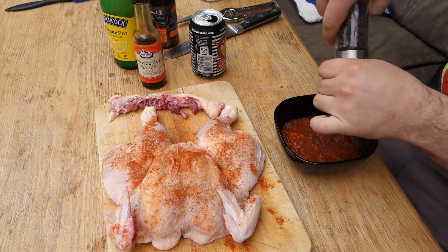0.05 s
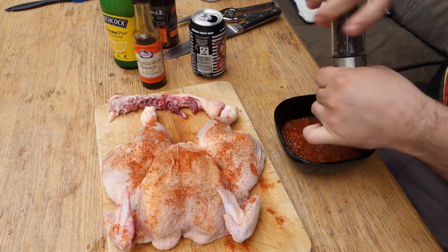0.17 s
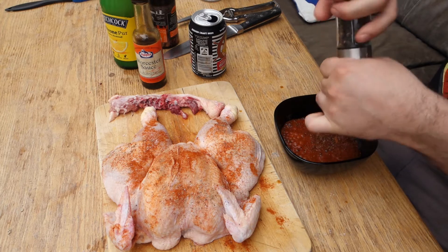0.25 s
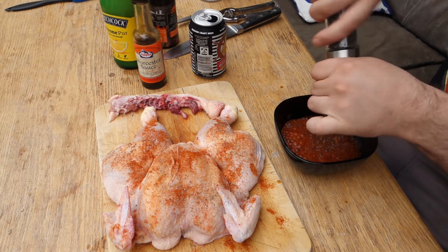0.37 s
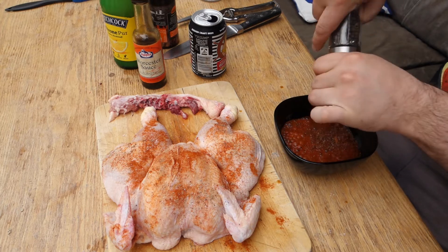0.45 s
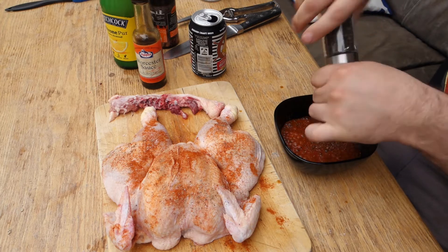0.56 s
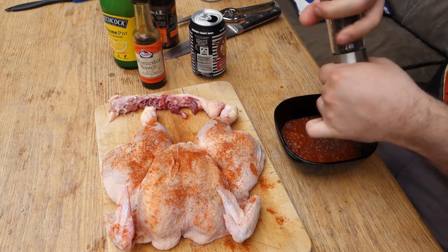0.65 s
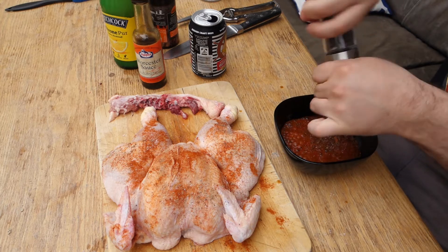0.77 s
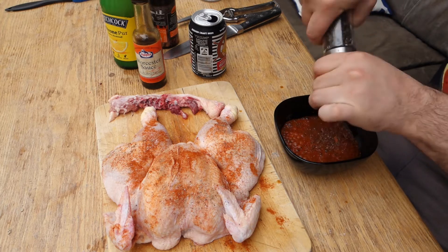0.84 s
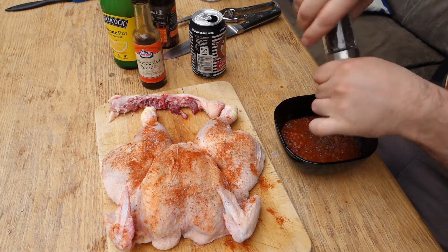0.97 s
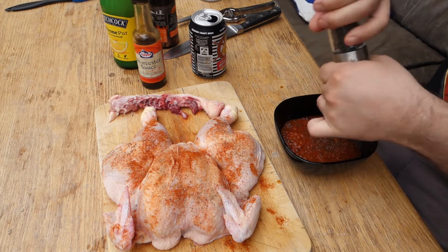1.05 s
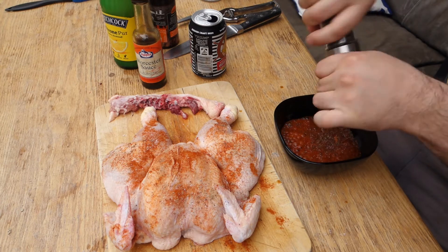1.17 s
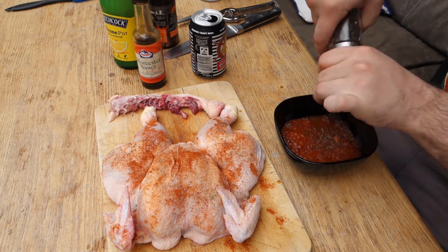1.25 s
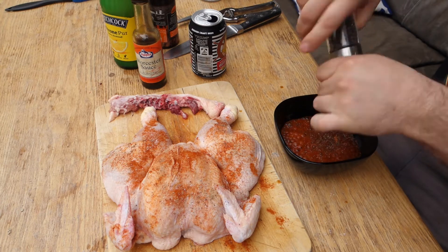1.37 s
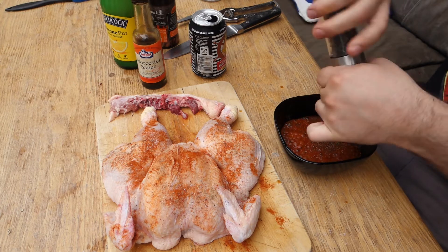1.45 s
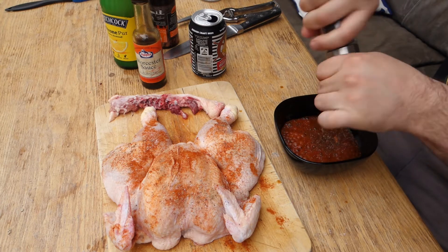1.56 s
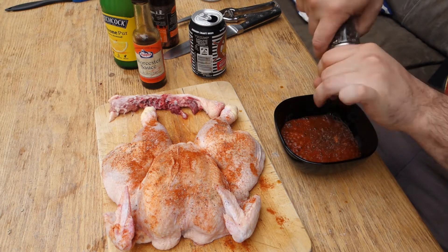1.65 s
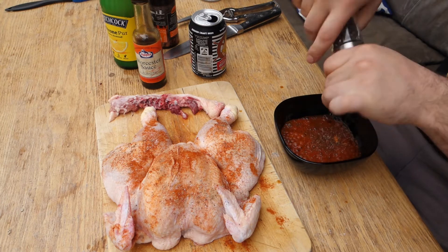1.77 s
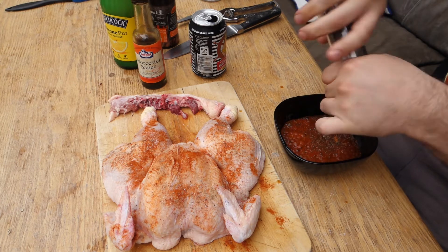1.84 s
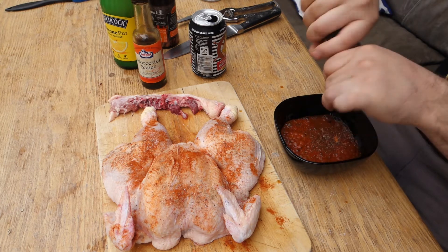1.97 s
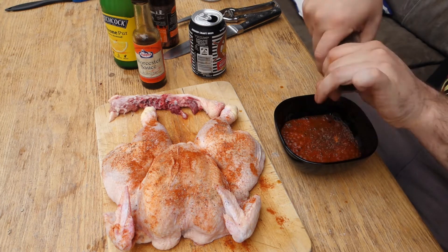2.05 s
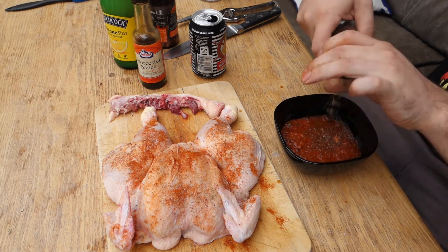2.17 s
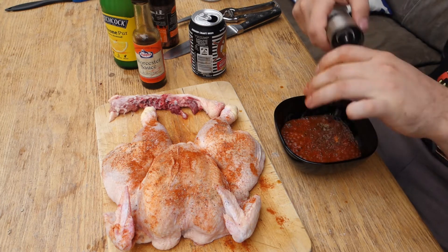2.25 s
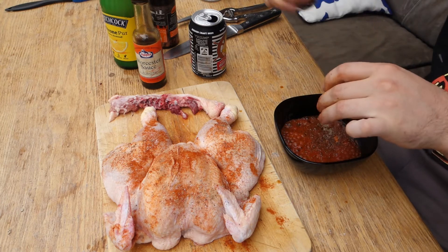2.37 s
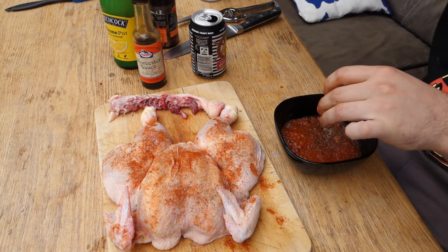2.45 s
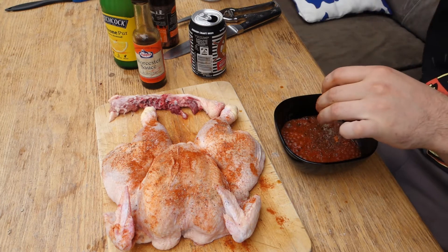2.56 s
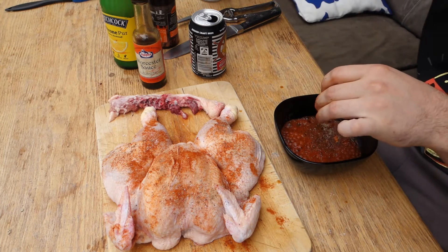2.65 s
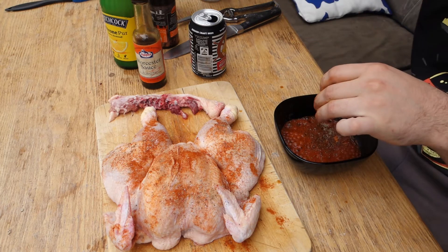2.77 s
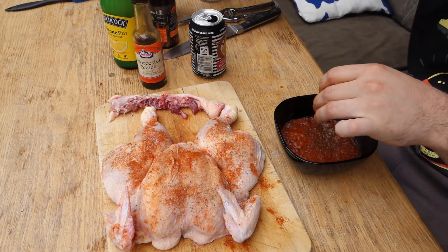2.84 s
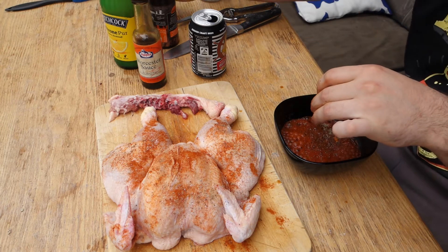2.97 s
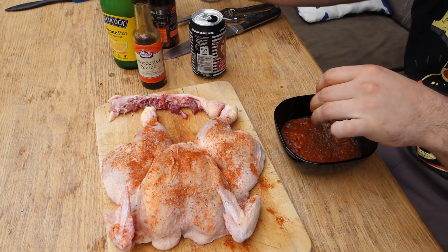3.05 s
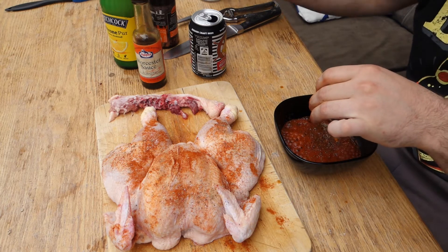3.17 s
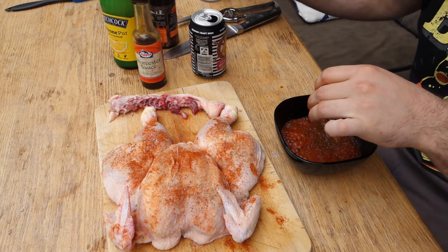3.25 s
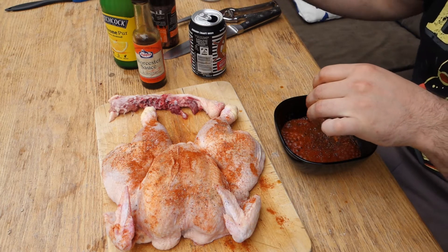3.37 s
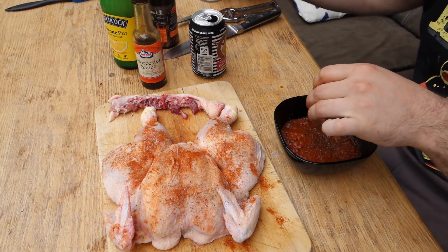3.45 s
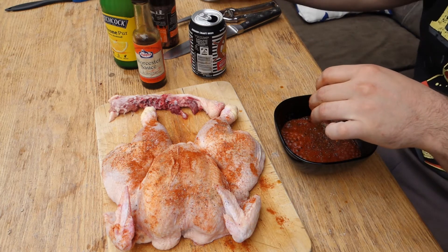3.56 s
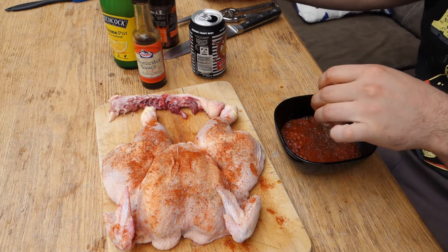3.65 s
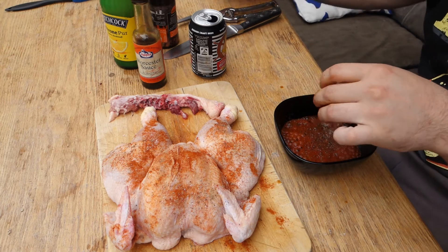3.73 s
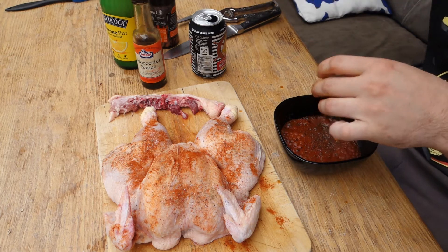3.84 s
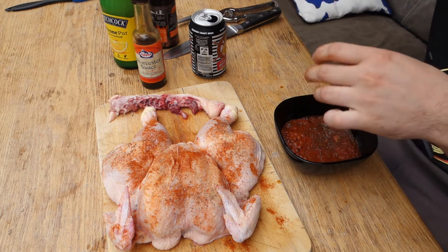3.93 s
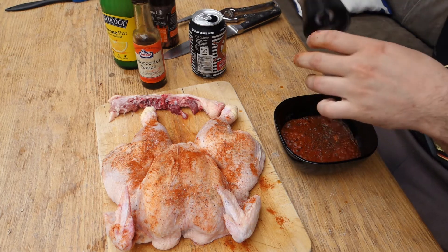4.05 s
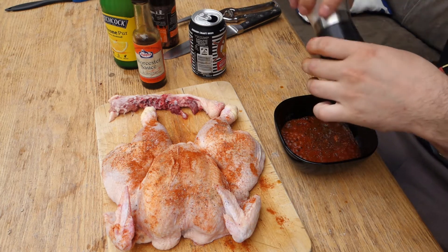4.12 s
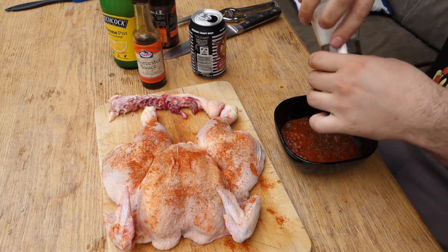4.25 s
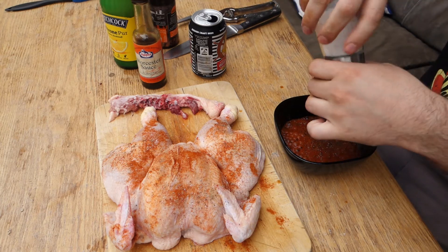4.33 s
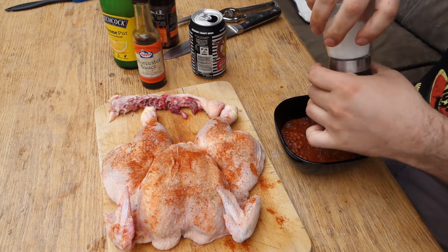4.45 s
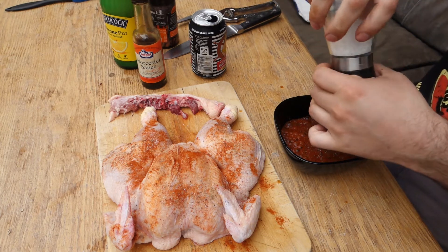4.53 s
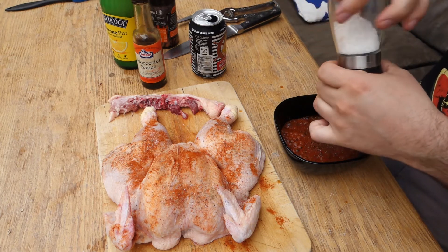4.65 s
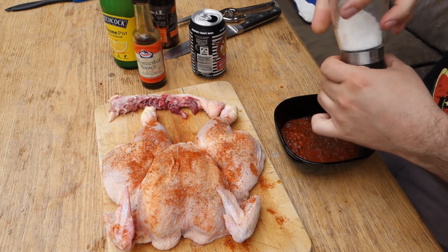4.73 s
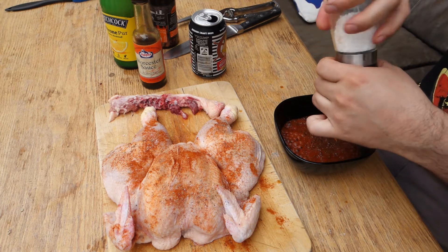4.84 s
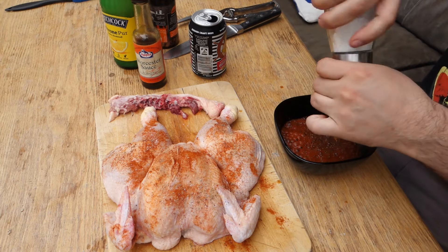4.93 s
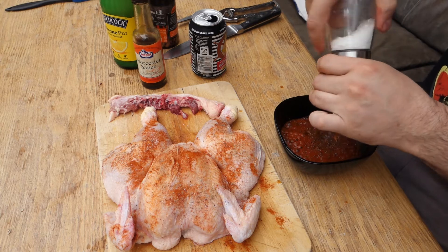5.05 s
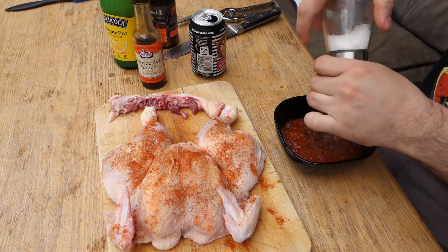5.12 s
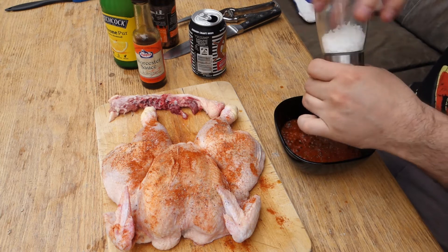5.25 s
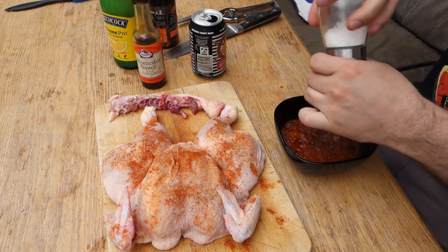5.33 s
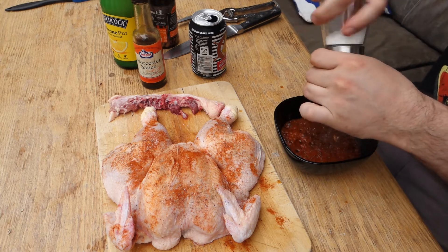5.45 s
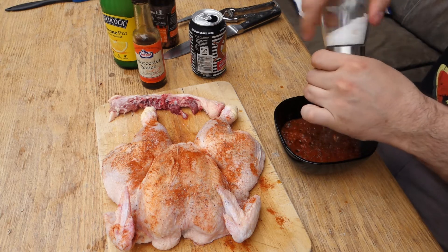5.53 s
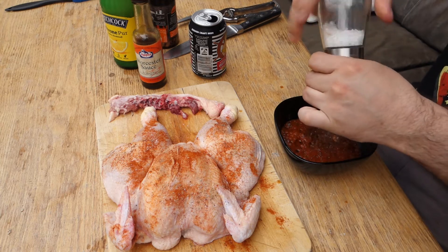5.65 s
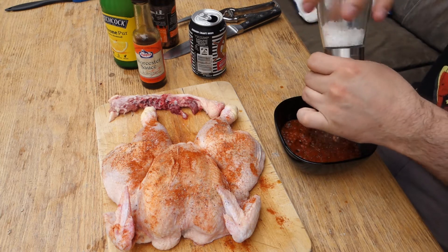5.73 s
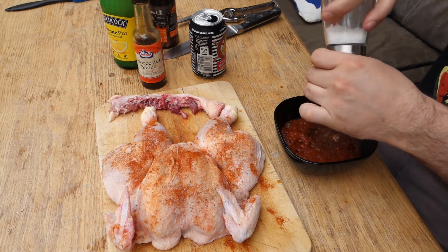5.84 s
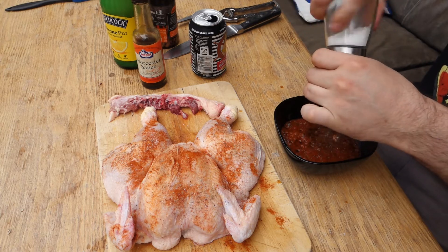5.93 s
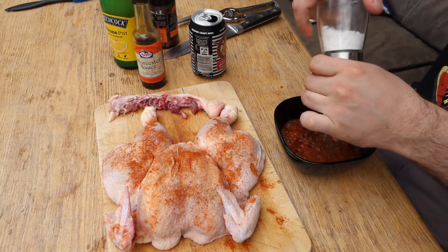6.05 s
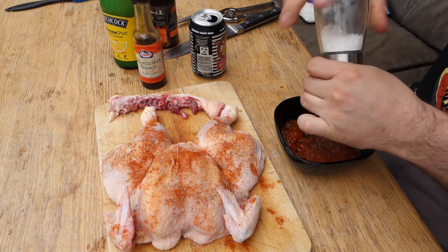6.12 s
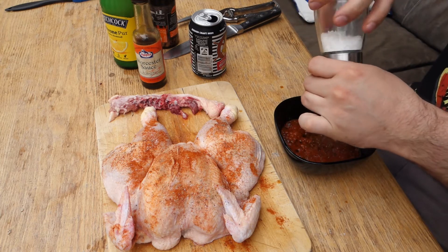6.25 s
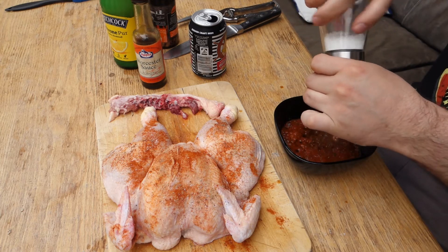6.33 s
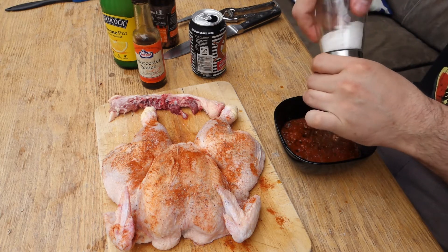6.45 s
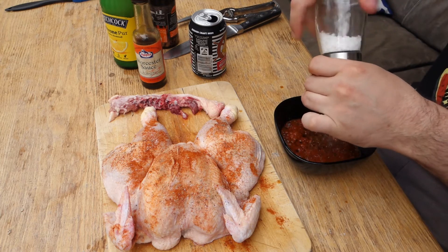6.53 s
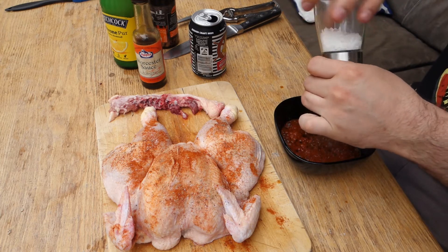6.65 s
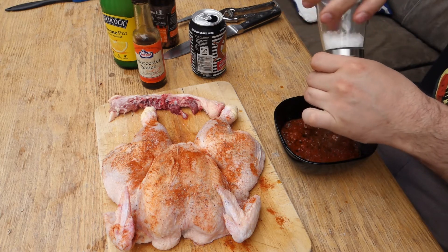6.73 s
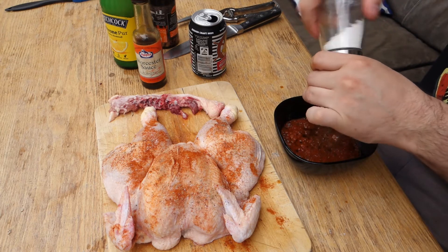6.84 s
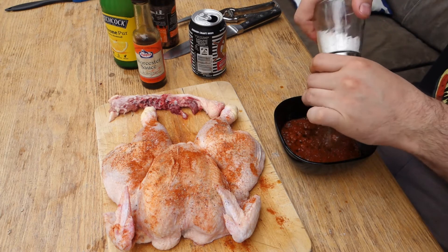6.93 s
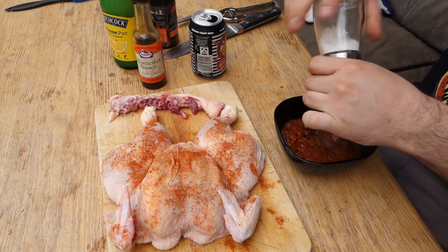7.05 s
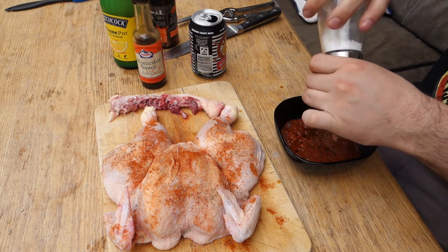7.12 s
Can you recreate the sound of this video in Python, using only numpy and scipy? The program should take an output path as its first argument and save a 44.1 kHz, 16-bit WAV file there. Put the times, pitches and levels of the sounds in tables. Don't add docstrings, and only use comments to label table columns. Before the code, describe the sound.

A pepper mill is ground in quick crunchy twists, set down with a wooden knock, then a salt mill cracks and grinds in harsher bursts.

```python
import sys
import numpy as np
from scipy import signal
from scipy.fft import rfft, irfft, next_fast_len
from scipy.io import wavfile
from scipy.ndimage import uniform_filter1d, map_coordinates

SR = 44100
rng = np.random.default_rng(int(sys.argv[2]) if len(sys.argv) > 2 else 0)


def generate_wav(sig):
    pcm = np.round(np.clip(np.atleast_2d(sig).T, -1, 1) * 32767).astype(np.int16)
    wavfile.write(sys.argv[1], SR, pcm)


def gain_from_db(level_db):
    decades = np.asarray(level_db, float) / 20
    return 10 ** decades


N = 317079


def unit(x):
    return x / np.sqrt(np.mean(x ** 2) + 1e-20)


def along(points, hz):
    f, v = np.transpose(points)
    return np.interp(np.log(hz + 1), np.log(f + 1), v)


def filtered(x, response):
    m = 2 * next_fast_len(N // 2 + 8192)
    return irfft(rfft(x, m) * response(np.fft.rfftfreq(m, 1 / SR)), m)[..., :N]


def causal(spectrum):
    def response(hz):
        cepstrum = irfft(np.log(gain_from_db(np.maximum(along(spectrum, hz), -70))))
        cepstrum[1:len(hz) - 1] *= 2
        cepstrum[len(hz):] = 0
        return np.exp(rfft(cepstrum))
    return response


def modes(table):
    def response(f):
        total = 0
        for k, (center, width, db) in enumerate(table):
            damping = 1j * f * width
            total = total + (-1) ** k * gain_from_db(db) * damping / (center * center - f * f + damping)
        return total
    return response


def ringing(x, table):
    return unit(filtered(x, lambda hz: modes(table)(hz) ** 2))


def bursts(s, hz, cycles, size, count):
    phase = hz[:, None] * np.arange(count) / SR
    attack = np.minimum(phase + .3, 1)
    rows = size[:, None] * np.sin(2 * np.pi * phase) * gain_from_db(-60 * phase / cycles) * attack
    at = np.round(s * SR).astype(int)[:, None] + np.arange(count)
    return np.bincount(at.ravel(), rows.ravel(), N + count)[:N]


def notes(table, cycles, db):
    s, peak_db, hz = np.transpose(table)
    return bursts(s, hz, cycles, gain_from_db(peak_db + db), count=4000)


def sizes(count, spread_db):
    return gain_from_db(spread_db * np.minimum(rng.exponential(1, count), 2.4))


def ticks(count, spread_db, bed):
    hits = np.bincount(rng.integers(0, N, count), sizes(count, spread_db), N)
    scratch = signal.lfilter([1], [1, -.93], hits) * rng.standard_normal(N)
    return unit(scratch) + bed * rng.standard_normal(N)


def crunch(count, spread_db, cycles, snap, bed):
    hz = 640 * 25 ** rng.random(count)
    start_s = rng.random(count) * N / SR
    grains = unit(bursts(start_s, hz, cycles, hz * sizes(count, spread_db), count=140))
    return grains + snap * ticks(count=3000, spread_db=spread_db, bed=bed)


def patchy(x, patchy_db):
    z = signal.stft(x, nperseg=256)[2]
    field = uniform_filter1d(rng.standard_normal(z.shape), size=4, axis=0)
    field = uniform_filter1d(field, size=7, axis=1)
    return unit(signal.istft(z * gain_from_db(patchy_db * unit(field)), nperseg=256)[1][:N])


def slips(rate_hz, depth_db):
    knots = rng.standard_normal(int(N * rate_hz / SR) + 4)
    return unit(gain_from_db(depth_db * map_coordinates(knots, [np.arange(N) * rate_hz / SR], order=1)))


def strokes(start, end, start_db, end_db, rise, fall):
    gain, deep_db = np.zeros(N), 70
    for a, b, da, db, up, down in np.broadcast(start, end, start_db, end_db, rise, fall):
        times = np.array([a - deep_db / up, a, max(a, b) + 1 / SR, max(a, b) + deep_db / down])
        at = np.arange(*np.clip(times[[0, -1]] * SR, 0, N).astype(int))
        gain[at] += gain_from_db(np.interp(at / SR, times, [da - deep_db, da, db, db - deep_db]))
    return uniform_filter1d(gain, size=90)


# (frequency [Hz], density [dB per Hz])
AIR_COLOUR = [(53, -57), (90, -18), (586, -7.5), (639, -1.5), (867, -5), (925, -4), (1010, -7),
              (1600, -5.5), (2690, -8), (3570, -12.5), (5520, -19.5), (13500, -22.5), (15500, -15),
              (16400, -46)]
# (frequency [Hz], correlation [1])
AIR_ALIKE = [(60, 0.98), (180, 0.84), (550, 0.37), (1650, 0.2), (4970, 0.064), (15000, 0.56)]
# (frequency [Hz], width [Hz], level [dB])
FAN_DUCT = [(815, 70, 3), (1630, 60, 6)]
# (start [s], end [s], start level [dB], end level [dB])
RUSTLE = [
    (0.0, 2.7, -59, -65),
    (4.05, 7.2, -64, -59),
]


def air():
    air_db, hiss_db = -60.5, 3.5

    def mid_side(hz):
        turn = np.arccos(np.clip(along(AIR_ALIKE, hz), -1, 1)) / 2
        colour = gain_from_db(along(AIR_COLOUR, hz)) * (1 + np.abs(modes(FAN_DUCT)(hz)))
        return colour * [np.cos(turn), np.sin(turn)]

    mid, side = filtered(rng.standard_normal((2, N)), mid_side)
    pair = unit(np.array([mid + side, mid - side]))
    treble = filtered(pair, lambda hz: np.clip(hz / 3000 - 1, 0, 1))
    steady = gain_from_db(air_db) * (pair + (gain_from_db(hiss_db) - 1) * treble)
    return steady + strokes(*np.transpose(RUSTLE), 90, 60) * treble


# (start [s], end [s], start crushing [dB], end crushing [dB], run-up [dB per s])
PEPPER_TWISTS = [
    (0.002, 0.017, -36.5, -38, 901),
    (0.345, 0.414, -43.5, -37.5, 2502),
    (0.769, 0.842, -41, -35.5, 2500),
    (0.955, 1.01, -46.5, -57, 600),
    (1.194, 1.245, -38, -40.5, 195),
    (1.256, 1.366, -51, -52, 295),
    (1.617, 1.678, -33, -42.5, 287),
    (1.757, 1.814, -59, -58.5, 300),
    (1.969, 2.089, -38, -37.5, 490),
]
# (start [s], end [s], start level [dB], end level [dB], thin high ring [dB])
PEPPER_SWINGS = [
    (0.251, 0.27, -34, -36.5, -16.5),
    (0.343, 0.34, -41, -38, -33),
    (0.645, 0.73, -39, -38, -19),
    (1.094, 1.14, -31.5, -41, -13),
    (1.473, 1.515, -49, -32, -15),
    (1.933, 1.96, -35.5, -62, -16),
    (2.02, 2.006, -36.5, -30.5, -18),
    (2.464, 2.5, -39, -51, -3),
    (2.626, 2.77, -55.5, -75, -22),
]


def pepper_hand():
    a, b, da, db, runup = np.transpose(PEPPER_TWISTS)
    crush = strokes(a, b, da, db, runup, 350)
    bite_db = da + 35 * np.log10(runup / 1410)
    shells = strokes(a, b, da - 22, db - 15, runup, 123)
    shells = shells + strokes(a, a, bite_db, bite_db, 3100, 880)
    a, b, da, db, thin_db = np.transpose(PEPPER_SWINGS)
    trickle = strokes(a - 0.11, a, -65, -65, 200, 560)
    corn = strokes(a, b, da, db, 620, 560) + trickle
    thin = strokes(a, b, da + thin_db, db + thin_db, 460, 280) + gain_from_db(-13) * trickle
    return crush, shells, corn, thin


# (frequency [Hz], density [dB per Hz])
PEPPER_BURR = [(88, -58), (150, -31), (548, -12.5), (681, -9.5), (1090, -11.5), (1230, -8), (1460, -8),
               (1890, -2.5), (3150, -16.5), (5150, -11), (6780, -10.5), (11300, -22), (15200, -17.5),
               (16400, -68)]
BRITTLE_SHELLS = [(2500, -29.5), (4500, 13.5), (8000, 17), (11000, 3), (15800, 5), (16400, -38.5)]
# (frequency [Hz], width [Hz], level [dB])
PEPPER_HOLLOW = [(2030, 550, 0)]
CORN_GLASS = [(6980, 620, -5.5), (12600, 300, -13.5), (6200, 3200, -16)]
THIN_GLASS = [(15450, 800, 0)]
METAL_CAP = [(9250, 450, 0)]
# (start [s], end [s], start level [dB], end level [dB])
TIP_OVER = [
    (2.363, 2.365, -54, -76),
    (2.426, 2.458, -46, -37),
    (2.55, 2.678, -73, -66),
]


def pepper():
    crush, top, corn, thin = pepper_hand()
    grains = crunch(count=14000, spread_db=1.3, cycles=7, snap=.3, bed=1.5)
    breaking = slips(70, depth_db=1.2) * patchy(grains, patchy_db=2.5)
    burr = unit(filtered(breaking, causal(PEPPER_BURR))) + gain_from_db(-8) * ringing(breaking, PEPPER_HOLLOW)
    shells = unit(filtered(breaking, causal(BRITTLE_SHELLS)))
    contacts = ticks(count=4500, spread_db=2.6, bed=.6)
    jar = gain_from_db(-3) * corn * ringing(contacts, CORN_GLASS)
    jar = jar + gain_from_db(5) * thin * ringing(contacts, THIN_GLASS)
    cap = ringing(contacts, METAL_CAP) + gain_from_db(-14.5) * unit(breaking)
    tip = gain_from_db(-1) * strokes(*np.transpose(TIP_OVER), 950, 390) * cap
    return gain_from_db(-0.5) * crush * burr + gain_from_db(2.5) * top * shells + jar + tip


# (frequency [Hz], left-right level [dB])
LEAN = [(60, 4.5), (150, 4), (380, -1.5), (950, -1.5), (2380, -5), (5980, -14.5), (15000, -3.5)]
# (frequency [Hz], left lead [rad])
LEAD = [(0, -2.2), (3620, 0.64), (5080, -1.76), (8960, -0.89), (10800, -1.26), (15800, 0.54), (16700, 0.6)]


def from_the_right(mills):
    def port(hz, side):
        return gain_from_db(side * along(LEAN, hz) / 2) * np.exp(.5j * side * along(LEAD, hz))
    return filtered(mills, lambda hz: [port(hz, 1), port(hz, -1)])


# (frequency [Hz], 60 dB decay [s])
ROOM_T60 = [(150, 0.31), (800, 0.26), (2500, 0.38), (7000, 0.28), (15000, 0.19)]


def room(x):
    hz, t, z = signal.stft(rng.standard_normal((2, SR // 2)), SR, nperseg=256)
    tail = signal.istft(z * gain_from_db(-60 * t / along(ROOM_T60, hz)[:, None]), SR, nperseg=256)[1]
    tail = tail / np.linalg.norm(tail[0])
    delayed = np.pad(x, (250, 0))[None]
    both, apart = signal.fftconvolve(delayed, tail, axes=1)[:, :N]
    apart = filtered(apart, lambda f: np.clip(f / 3000 - .05, .02, .95))
    return np.array([both + apart, both - apart])


# (time [s], peak [dB], pitch [Hz])
PEPPER_JOLTS = [(0.0317, -27, 2030), (0.3473, -26.5, 2140), (0.3535, -31, 2080), (0.384, -27, 2080),
                (0.4049, -22, 1970), (0.8217, -43, 2100), (0.833, -32, 1940), (0.8575, -42, 2080),
                (0.8636, -30, 1930), (0.982, -35, 1160), (1.131, -46, 2030), (1.1358, -33.5, 1950),
                (1.176, -41, 2040), (1.2056, -18, 1950), (1.2422, -25, 1780), (1.2518, -19.5, 1765),
                (1.2634, -25.5, 2350), (1.276, -38, 2100), (1.3398, -35, 1520), (1.5551, -35.5, 1720),
                (1.5724, -35, 1930), (1.6144, -21.5, 2090), (1.6191, -20.5, 2490), (1.6326, -27, 1730),
                (1.644, -18.5, 1740), (1.6563, -23, 2260), (1.701, -34, 2350), (1.7724, -34, 1770),
                (1.959, -31, 1940), (1.9659, -23, 1850), (1.9894, -19.5, 1950), (1.9948, -21.5, 2020),
                (2.001, -29, 1800), (2.0109, -20, 1780), (2.0242, -30, 1900), (2.046, -29.5, 1310),
                (2.0625, -30, 1900), (2.08, -25.5, 1840), (2.094, -35, 1970), (2.123, -33, 2480)]
SALT_JOLTS = [(4.825, -29, 1910), (4.8867, -25, 2140), (4.9082, -34, 2110), (4.9183, -17.5, 1600),
              (4.9239, -18, 2020), (4.9368, -32, 1440), (4.9414, -16, 2120), (4.9644, -17.5, 1860),
              (4.9827, -18.5, 2210), (5.0114, -14, 1050), (5.0229, -16.5, 1112), (5.0326, -16.5, 1330),
              (5.0371, -21, 1075), (5.042, -22, 1350), (5.0512, -21, 1136), (5.0712, -26.5, 1570),
              (5.3226, -35, 1080), (5.381, -32.5, 1810), (5.4125, -37, 1770), (5.42, -24, 1700),
              (5.4332, -27, 2040), (5.481, -22.5, 1620), (5.4906, -26, 1520), (5.5038, -21, 2030),
              (5.5158, -15, 1960), (5.5364, -21, 1760), (5.5533, -18.5, 1026), (5.5683, -39, 1820),
              (5.826, -32.5, 1720), (5.8718, -31, 1950), (5.8862, -29, 2080), (5.894, -27, 1840),
              (5.9066, -23, 1950), (5.9265, -25, 2050), (5.9702, -11, 1945), (5.9875, -23, 1810),
              (5.9967, -19.5, 1810), (6.2728, -29, 1900), (6.329, -23.5, 2120), (6.3605, -17.5, 2100),
              (6.375, -15.5, 1950), (6.3882, -16.5, 2070), (6.4028, -20, 2690), (6.4107, -20, 2030),
              (6.4286, -18, 1765), (6.4358, -23, 2140), (6.4604, -29, 2080), (6.7345, -26, 1950),
              (6.766, -33, 1900), (6.7785, -19.5, 1920), (6.8085, -17, 1900), (6.8305, -14.5, 1960),
              (6.839, -15, 1910), (6.8602, -23, 1103), (6.8684, -20, 2580), (6.8761, -20, 1320),
              (6.8867, -15, 1880), (7.0003, -31.5, 1050), (7.0133, -30.5, 1890)]


def jolts():
    s, db, hz = np.transpose(PEPPER_JOLTS + SALT_JOLTS)
    cycles = np.maximum(db[:, None] + 52, 10)
    thud = bursts(s, hz, cycles, gain_from_db(db + 3.5), count=1200)
    thud = thud - bursts(s, hz, cycles / 4, gain_from_db(db + 4), count=1200)
    thud = thud + bursts(s, 1.57 * hz, 4.7, gain_from_db(db - 0.5), count=600)
    return filtered(thud, lambda f: 1j * f / (700 + 1j * f))


# (time [s], peak [dB], pitch [Hz], broadband snap [dB])
PEPPER_CRACKS = [(0.1847, -42, 7000, -13), (0.2184, -36, 6900, -14), (0.2353, -27, 7450, -25),
                 (0.2473, -26, 7140, -28), (0.275, -21, 6650, -24), (0.284, -33, 6860, -20),
                 (0.3266, -28, 6470, -25), (0.3441, -18, 8330, -14), (0.49, -39, 7520, -16),
                 (0.5666, -32.5, 6870, 0), (0.5948, -35, 7000, -24), (0.6446, -28, 6570, -25),
                 (0.656, -18.5, 6800, -22), (0.6638, -20, 7030, -26), (0.6706, -20, 6570, -20),
                 (0.6824, -22, 6870, -29), (0.709, -32, 6230, -22), (0.7227, -36, 6600, -7),
                 (0.7485, -33, 6440, -16), (0.7672, -20.5, 7850, -8), (0.7702, -21.5, 7720, -14),
                 (0.802, -28, 7660, -10), (1.0643, -30, 6950, -22), (1.0934, -26, 6700, -18),
                 (1.1084, -30, 6980, -20), (1.123, -22, 6800, -11), (1.175, -25.5, 8860, -14),
                 (1.205, -24, 8460, -36), (1.4602, -40, 6980, -22), (1.5138, -20, 6660, -19),
                 (1.5436, -25, 6900, -15), (1.554, -30, 6800, -22), (1.595, -42, 8900, -20),
                 (1.6088, -25, 7400, -24), (1.613, -20, 7470, -22), (1.8747, -34.5, 7300, -18),
                 (1.9215, -31, 7100, -18), (1.9352, -41, 7260, -20), (1.9667, -35, 8660, -16),
                 (1.9888, -22, 8500, -28), (1.995, -24, 8200, -18), (2.029, -34, 7200, -20),
                 (2.046, -23, 7800, -12), (2.081, -21.5, 7760, 7), (2.3959, -38, 6900, -20),
                 (2.523, -38, 7040, -20), (2.5882, -36, 7130, -20), (2.625, -36, 7170, -23)]
SALT_CRACKS = [(4.102, -29, 6000, -20), (4.111, -30, 7300, -22), (4.118, -23, 6740, -30),
               (4.1543, -27, 6400, -24), (4.1704, -29, 6360, -20), (4.185, -27, 7100, -37),
               (4.439, -30.5, 6350, -14.5), (4.608, -31.5, 6660, -21), (4.6394, -34, 9700, -9),
               (4.8244, -31.5, 3400, -4), (4.8557, -29, 4100, -8), (4.8676, -25, 3840, -18),
               (4.892, -19, 6640, -16), (4.9078, -18, 4670, -17), (4.9176, -12, 6700, -10),
               (4.9213, -24, 3700, -16), (4.9288, -14, 3600, -34), (4.9373, -14, 3800, -20),
               (4.956, -27, 7200, -14), (4.968, -22, 5140, -20), (4.976, -11, 5680, -21),
               (4.991, -23, 3820, -22), (5.003, -17.5, 6200, -24), (5.0112, -19, 5800, -18),
               (5.396, -31, 3830, -22), (5.41, -19, 4400, -13), (5.4184, -24, 4300, -22),
               (5.43, -15.5, 4930, -26), (5.4408, -17, 4630, -21), (5.5054, -21, 3540, -18),
               (5.5187, -14.5, 6840, -16), (5.5388, -22, 4170, -17), (5.5557, -19.5, 6200, -7),
               (5.5667, -17.5, 3880, -10), (5.8255, -37, 3170, -4), (5.902, -22, 4500, -32),
               (5.9503, -31, 6760, -27), (5.97, -19, 3430, -14), (6.2732, -28.5, 3200, -7),
               (6.3205, -28, 6550, -18), (6.3269, -20.5, 4400, -11), (6.3443, -19, 3900, -22),
               (6.3552, -25, 4220, -11), (6.3646, -27, 4010, -22), (6.3998, -22.5, 6940, -18),
               (6.4275, -22, 3770, -26), (6.725, -26, 9400, -30), (6.7345, -39, 3270, -12),
               (6.8592, -27, 6750, -29), (6.8862, -24, 4300, -28), (6.9924, -31.5, 6600, -4)]
# (frequency [Hz], width [Hz], level [dB])
SNAPS = [(8000, 14000, -1), (2300, 3400, 3)]


def cracks():
    s, db, hz, snap_db = np.transpose(PEPPER_CRACKS + SALT_CRACKS)
    corn = np.arange(len(s)) < len(PEPPER_CRACKS)
    size = gain_from_db(db + snap_db + 8.5 + corn * .8 * (db + 11))
    at, dull_hz = np.round(s * SR).astype(int), 5000
    hits = [np.bincount(at, size * kind, N) for kind in (hz > dull_hz, hz <= dull_hz)]
    scratch = signal.lfilter([1], [1, -.97], hits) * rng.standard_normal(N)
    snap = filtered(scratch, lambda f: [modes([row])(f) ** 2 for row in SNAPS]).sum(axis=0)
    ring_s = .0034 * (1.5 + 1.5 * corn[:, None])
    cycles = ring_s * hz[:, None]
    ring = bursts(s, hz, cycles, gain_from_db(db + 2.5), count=400)
    ring = ring - bursts(s, hz, cycles / 3, gain_from_db(db + 2.5), count=400)
    return snap + ring


# (time [s], peak [dB], chatter [s], brightness [dB])
KNOCKS = [(2.931, -15.5, 0.039, -8), (2.949, -20, 0.063, -6), (2.971, -22, 0.074, -9.5),
          (3.0, -26, 0.031, -4), (3.019, -28, 0.038, -10), (3.131, -24.5, 0.022, -10.5),
          (3.148, -27, 0.031, -20), (3.193, -27.5, 0.059, -20), (3.227, -24, 0.055, -19),
          (3.597, -56, 0.076, -21), (7.116, -46.5, 0.12, -28), (7.165, -48.5, 0.064, -4)]
# (start [s], end [s], start level [dB], end level [dB])
KNOCK_WASH = [
    (3.093, 3.147, -40, -38.5),
]
# (frequency [Hz], width [Hz], level [dB])
TABLE_MODES = [(420, 42, -19), (520, 120, 4), (685, 36, -12), (820, 43, 2), (1040, 33, -13)]
FOOT_EDGE = [(2530, 755, 3), (1550, 510, 2.5), (4000, 620, -24)]
# (frequency [Hz], density [dB per Hz])
WOOD = [(60, -44), (100, -43), (135, -4), (280, -9.5), (520, 4), (900, 0.5), (2100, -21), (6000, -58.5)]
# (time [s], peak [dB], pitch [Hz])
WOOD_NOTES = [(2.9301, -23.5, 400), (2.9474, -18, 668), (2.9585, -10, 830), (2.967, -13, 820),
              (2.9856, -11, 1085), (3.0007, -20.5, 464), (3.0166, -17, 1010), (3.0294, -26, 970),
              (3.0382, -33, 1090), (3.0474, -40, 800), (3.1305, -20, 430), (3.1411, -16.5, 490),
              (3.1524, -17, 495), (3.1642, -24, 780), (3.1925, -25, 660), (3.2087, -22, 490),
              (3.226, -21, 630), (3.2415, -25.5, 467), (3.2538, -35, 520), (3.2638, -50, 533),
              (3.2797, -30, 940), (3.3063, -49, 520)]
RIM_NOTES = [(2.9321, -44, 1650), (2.9546, -16, 1590), (2.9706, -17, 1370), (2.988, -20, 1820),
             (3.004, -18.5, 1480), (3.0182, -20.5, 1610), (3.0282, -31, 1460), (3.1311, -20, 2225),
             (3.142, -30, 2000), (3.1514, -24, 2040), (3.1919, -33, 2120), (3.2156, -30, 1600),
             (3.2264, -35, 1440), (3.249, -39, 1600), (3.322, -49, 4350), (3.336, -46, 4350)]
THUMPS = [
    (2.932, -22, 362),
    (3.131, -29, 164),
    (3.194, -24, 420),
]


def knocks():
    low, high, t = np.zeros(N + SR), np.zeros(N + SR), np.arange(SR // 4) / SR
    for s, db, chatter_s, bright_db in KNOCKS:
        push = gain_from_db(db - 60 * (t / max(chatter_s, .005)) ** 2) * rng.standard_normal(len(t))
        low[round(s * SR):][:len(t)] += push
        high[round(s * SR):][:len(t)] += gain_from_db(bright_db) * push
    wash = strokes(*np.transpose(KNOCK_WASH), 160, 87) * rng.standard_normal(N)
    low, high = low[:N] + wash, high[:N] + gain_from_db(-8) * wash
    top = filtered(low, lambda hz: gain_from_db(-16.5) * modes(TABLE_MODES)(hz) + gain_from_db(9.5) * causal(WOOD)(hz))
    top = top + notes(THUMPS, cycles=17.5, db=5)
    top = filtered(top, lambda f: (1j * f / (119 + 1j * f)) ** 3)
    rings = notes(WOOD_NOTES, cycles=23.7, db=-2) + notes(RIM_NOTES, cycles=28.5, db=-0.5)
    return top + gain_from_db(5) * filtered(high, modes(FOOT_EDGE)) + rings


# (start [s], end [s], start sliding [dB], end sliding [dB])
TILTS = [
    (3.99, 4.2, -59, -44),
    (4.115, 4.183, -37, -36),
    (4.34, 4.5, -67, -60),
    (4.445, 4.32, -45, -53.5),
    (4.606, 4.615, -43.5, -51.5),
    (7.168, 7.4, -45, -41),
]
# (start [s], end [s], start crushing [dB], end crushing [dB], ease-off [dB per s])
SALT_TWISTS = [
    (4.904, 5.025, -30, -23, 264),
    (5.408, 5.548, -36.5, -25, 339),
    (5.858, 5.987, -38, -22.5, 337),
    (6.331, 6.441, -31, -27.5, 268),
    (6.814, 6.87, -28.5, -24, 249),
]
SALT_RUNUP = [302, 520, 347, 1400, 251]
SETTLE_LAG_S = [0.13, 0.048, 0.065, 0.057, 0.099]
SETTLE_SHARE_DB = [-1.3, -1.1, -0.12, 0.59, 0.86]
# (start [s], end [s], start level [dB], end level [dB])
STRAYS = [
    (3.973, 4.11, -62.5, -51),
    (4.44, 4.52, -64, -66),
    (4.755, 4.77, -65, -69.5),
    (5.329, 5.367, -58, -57),
    (6.255, 6.273, -61, -57),
    (7.116, 7.233, -86, -69),
]


def salt_hand():
    a, b, da, db, ease = np.transpose(SALT_TWISTS)
    tilt = strokes(*np.transpose(TILTS), 1200, 160)
    crush = strokes(a, b, da, db, SALT_RUNUP, ease) + gain_from_db(-29) * tilt
    effort = lambda level_db: -36.5 + 0.33 * (level_db - db.max())
    pour = strokes(a, b, effort(da), effort(db), SALT_RUNUP, 154) + tilt
    rest, left_db = b + SETTLE_LAG_S, -53 + np.array(SETTLE_SHARE_DB)
    settling = strokes(rest, rest + 0.13, left_db, left_db - 6, 260, 220)
    shaken = strokes(a, b, -60, -60, 400, 300)
    return crush, pour, settling + shaken + strokes(*np.transpose(STRAYS), 400, 350), tilt


# (frequency [Hz], density [dB per Hz])
SALT_BURR = [(88, -93), (150, -31.5), (932, -4.5), (1030, -2.5), (1520, -3), (1970, -3.5), (2440, -5.5),
             (3540, -4), (3830, -9), (6780, -17), (8580, -23.5), (13500, -18.5), (15500, -28), (16400, -66)]
POUR = [(710, -46), (1200, -21), (1490, -26), (1940, -15), (4000, -20.5), (4750, -25), (5700, -11),
        (7000, -4.5), (10000, -11.5), (15000, -7), (16400, -55)]
# (frequency [Hz], width [Hz], level [dB])
SALT_HOLLOW = [(1950, 190, 11), (3570, 260, -1.5), (1050, 96, -8), (6900, 450, 5.5)]
SALT_GLASS = [(14000, 220, -2), (9640, 240, -2), (6700, 800, -9)]
# (start [s], end [s], start level [dB], end level [dB])
RUB = [
    (7.146, 7.193, -50, -49),
]


def salt():
    crush, pour, tick, tilt = salt_hand()
    grains = crunch(count=14000, spread_db=1.0, cycles=5.0, snap=0.91, bed=1.0)
    breaking = slips(220, depth_db=1) * slips(80, depth_db=2) * patchy(grains, patchy_db=2.5)
    burr = unit(filtered(breaking, causal(SALT_BURR)))
    burr = burr + gain_from_db(-13.5) * unit(filtered(breaking, modes(SALT_HOLLOW)))
    slide = patchy(filtered(ticks(count=12000, spread_db=2, bed=1.3), causal(POUR)), patchy_db=3)
    contacts = ticks(count=6000, spread_db=-11, bed=1)
    glass = ringing(slips(14, depth_db=2) * slips(120, depth_db=3.5) * contacts, SALT_GLASS)
    hollow = gain_from_db(-13) * tilt * ringing(contacts, [(6060, 2300, 0)])
    rub = strokes(*np.transpose(RUB), 900, 300) * ringing(contacts, [(2080, 300, 0)])
    return gain_from_db(-3) * crush * burr + gain_from_db(-6.5) * pour * slide + gain_from_db(0.5) * tick * glass + hollow + rub


def scene():
    mills = pepper() + jolts() + cracks() + salt()
    mills = filtered(mills, lambda hz: (1j * hz / (413 + 1j * hz)) ** 2)
    table = knocks()
    walls = room(gain_from_db(-8) * mills + gain_from_db(-3.5) * table)
    return air() + from_the_right(mills) + walls + table


def roll_off(x):
    return signal.sosfilt(signal.butter(12, 17120, fs=SR, output="sos"), x)


def record(dry):
    low_hz, top_hz = 105, 15950
    heard = filtered(dry, lambda hz: (1j * hz / (low_hz + 1j * hz)) ** 3 * (hz < top_hz))
    return roll_off(heard)


dry = scene()
out = record(dry)
generate_wav(out)
```